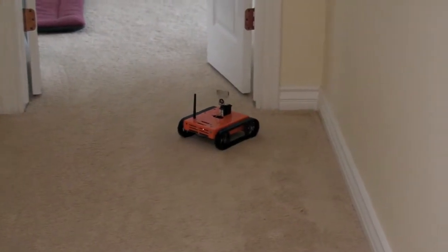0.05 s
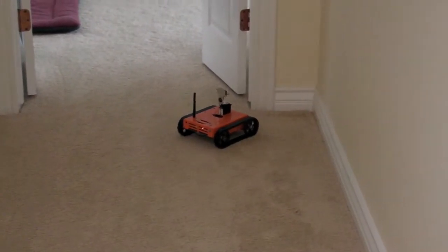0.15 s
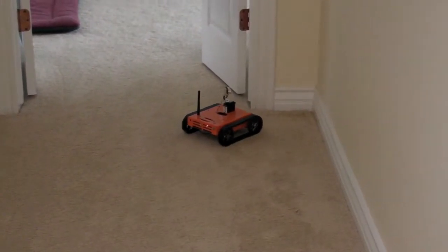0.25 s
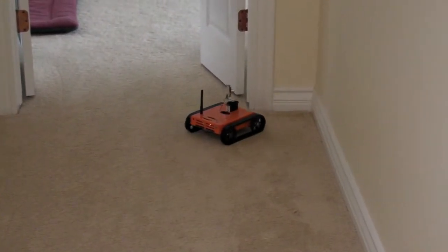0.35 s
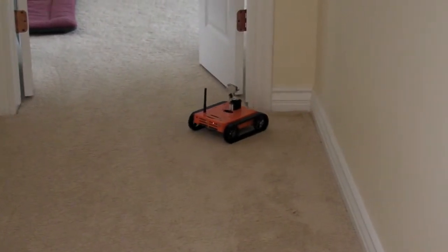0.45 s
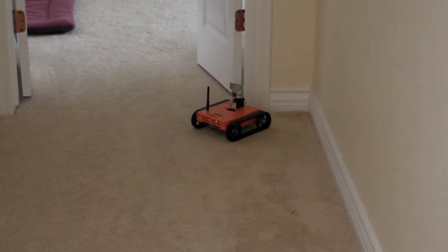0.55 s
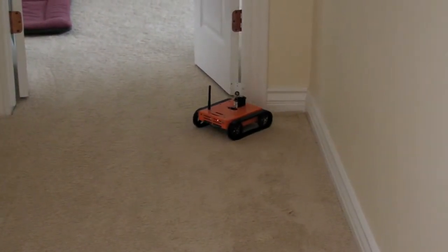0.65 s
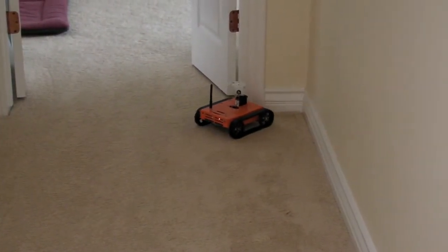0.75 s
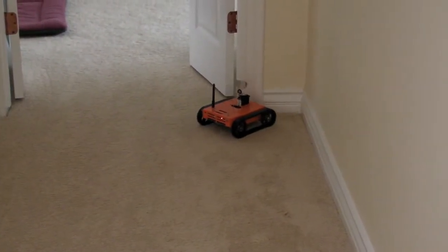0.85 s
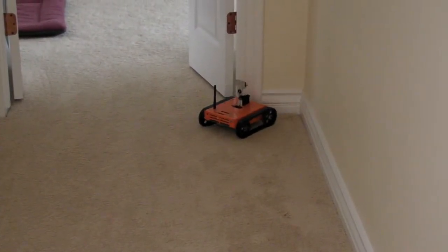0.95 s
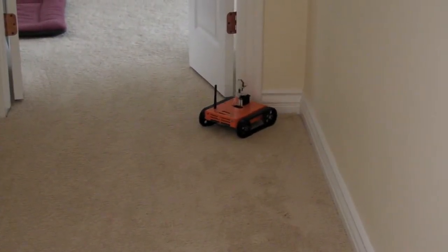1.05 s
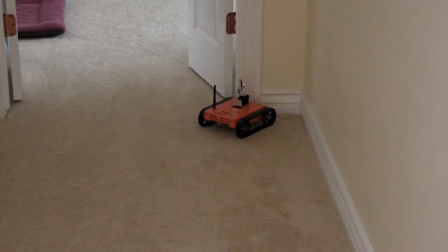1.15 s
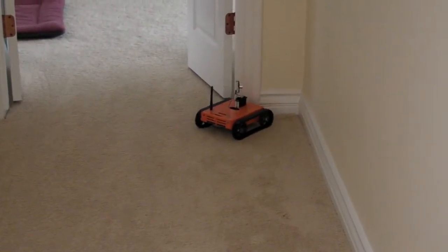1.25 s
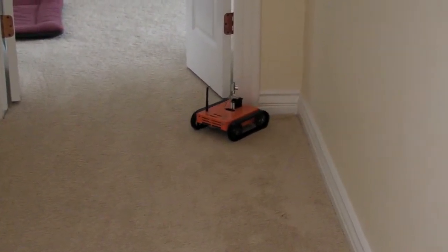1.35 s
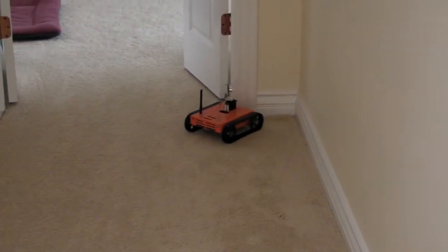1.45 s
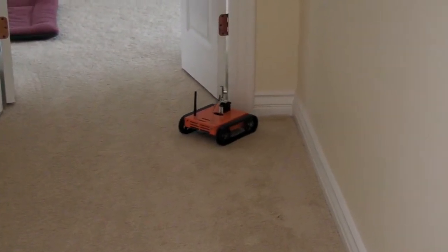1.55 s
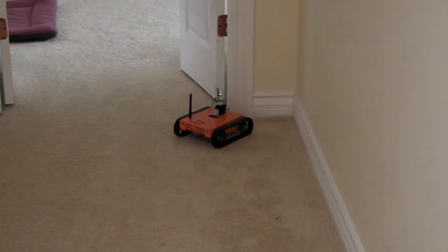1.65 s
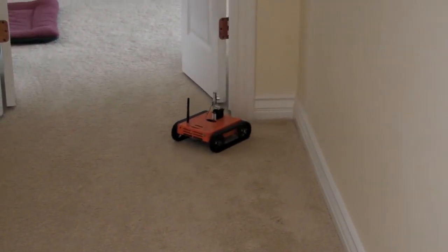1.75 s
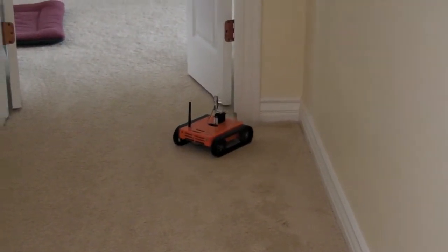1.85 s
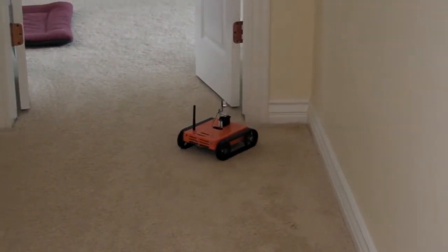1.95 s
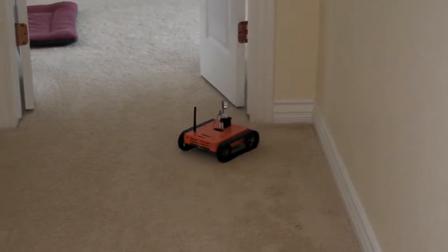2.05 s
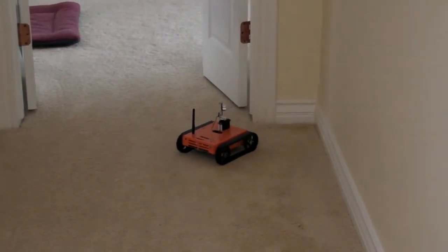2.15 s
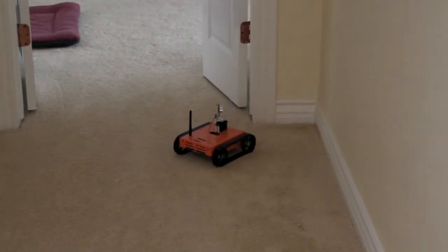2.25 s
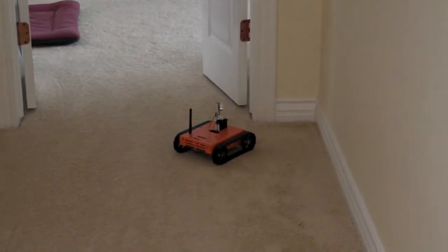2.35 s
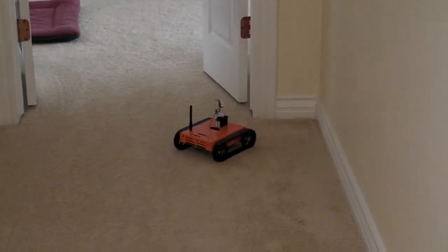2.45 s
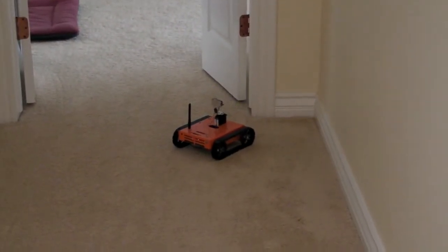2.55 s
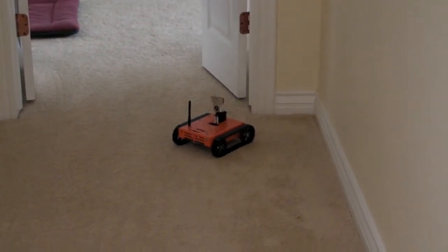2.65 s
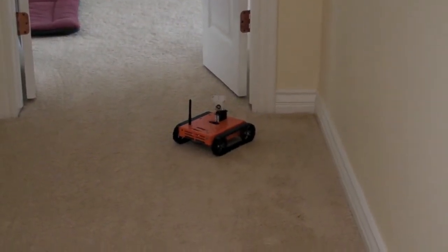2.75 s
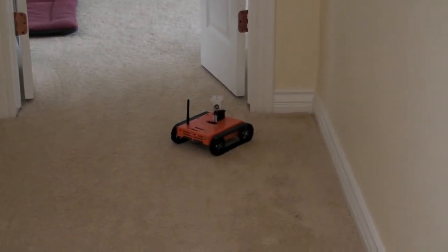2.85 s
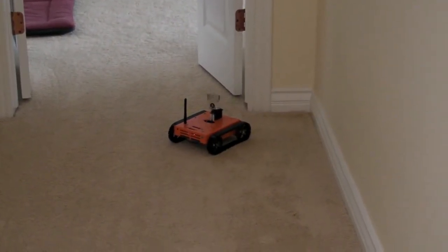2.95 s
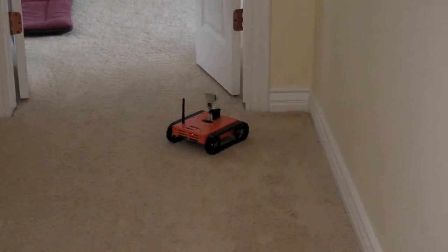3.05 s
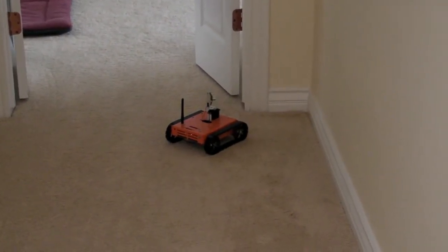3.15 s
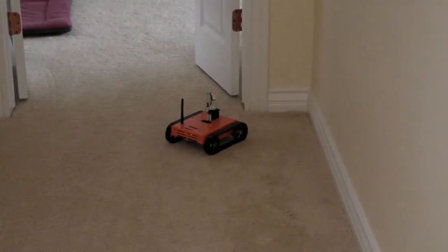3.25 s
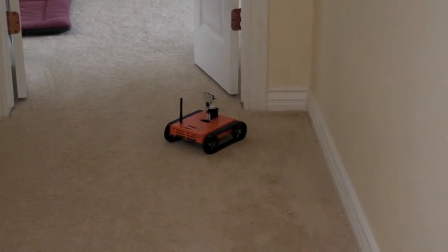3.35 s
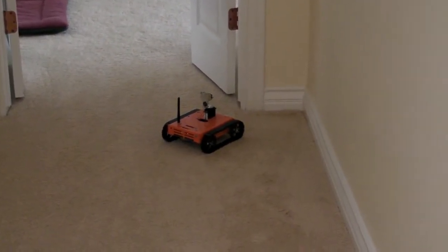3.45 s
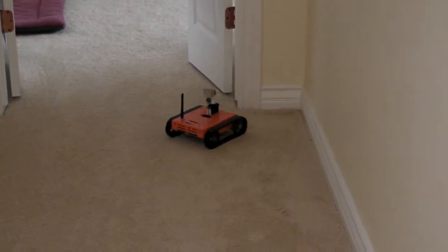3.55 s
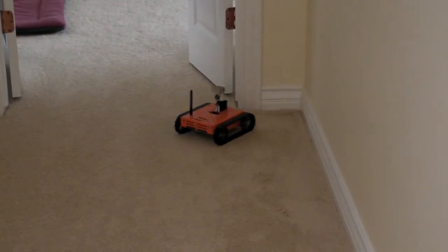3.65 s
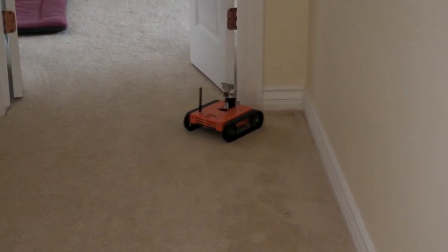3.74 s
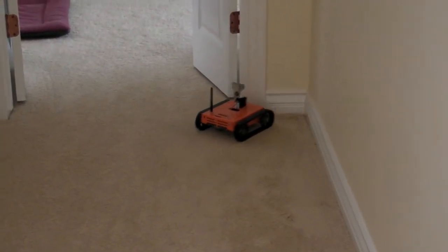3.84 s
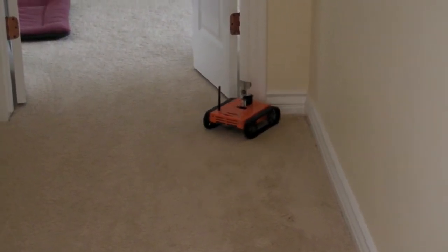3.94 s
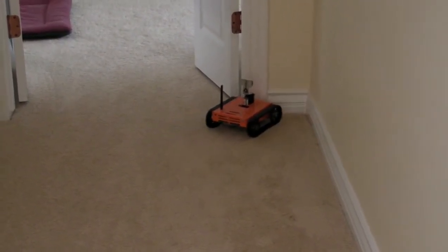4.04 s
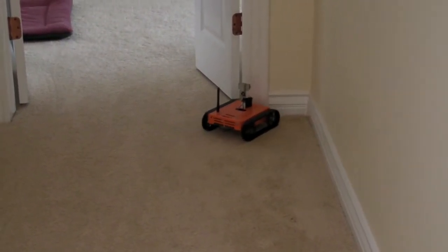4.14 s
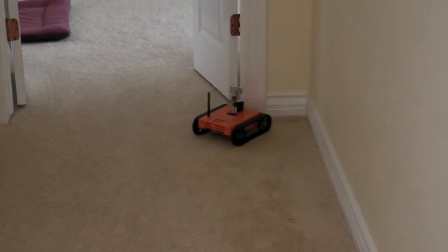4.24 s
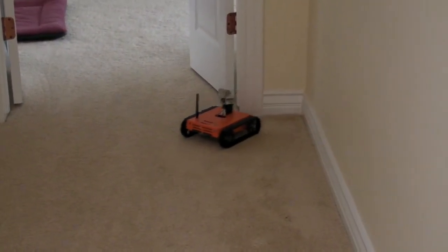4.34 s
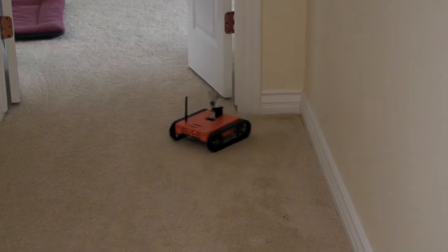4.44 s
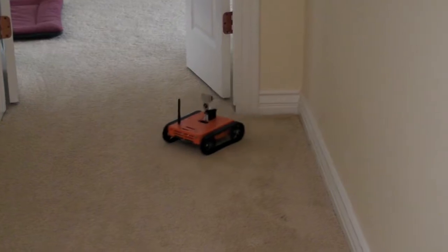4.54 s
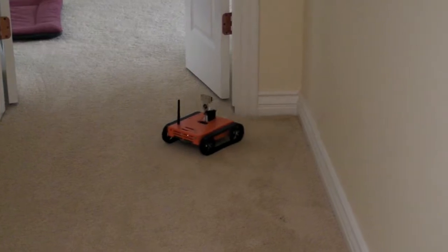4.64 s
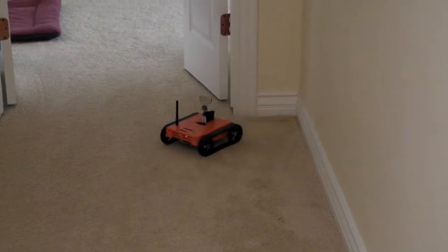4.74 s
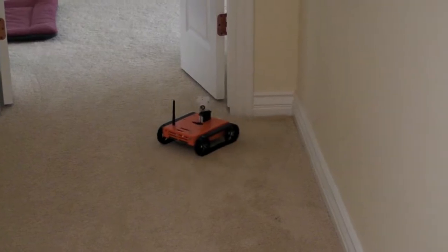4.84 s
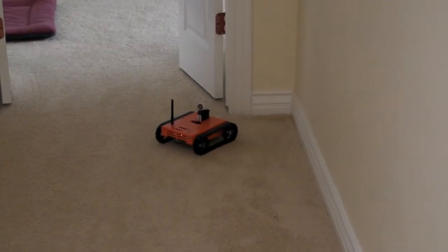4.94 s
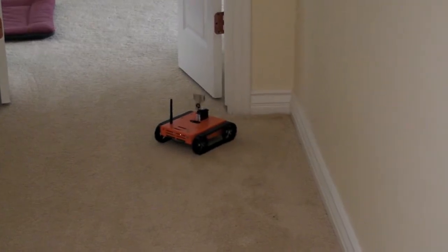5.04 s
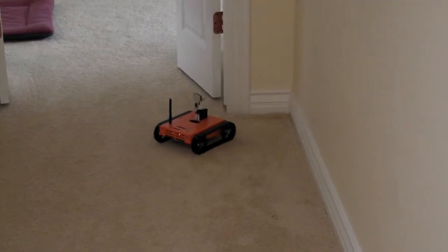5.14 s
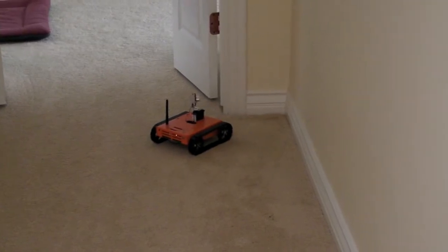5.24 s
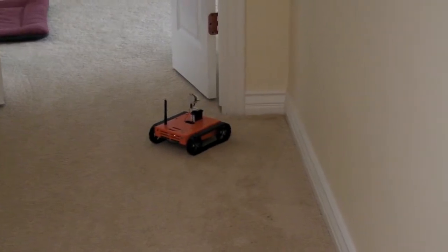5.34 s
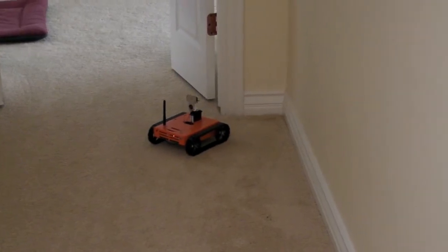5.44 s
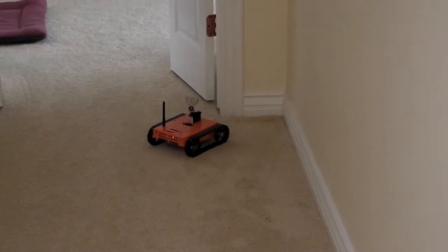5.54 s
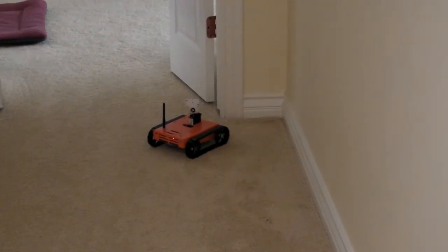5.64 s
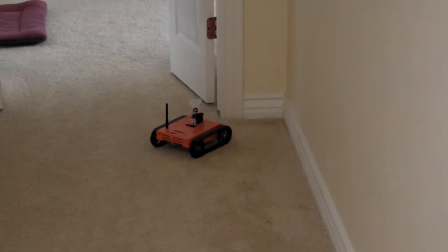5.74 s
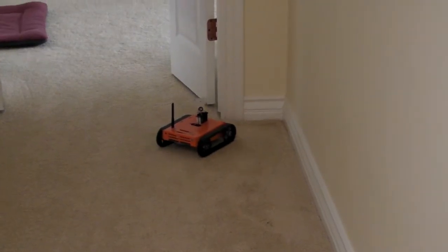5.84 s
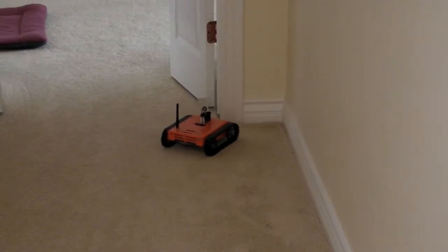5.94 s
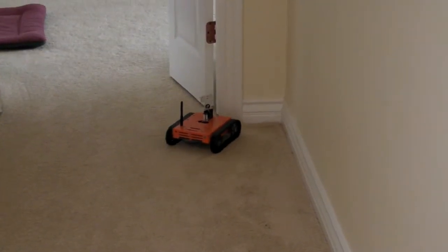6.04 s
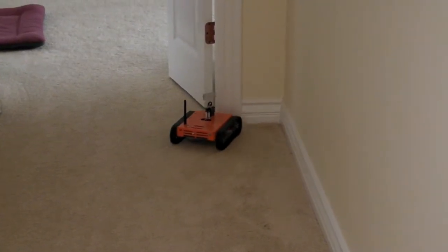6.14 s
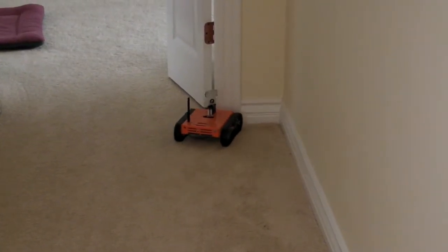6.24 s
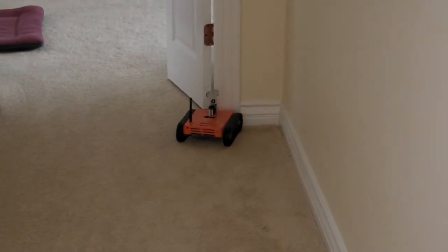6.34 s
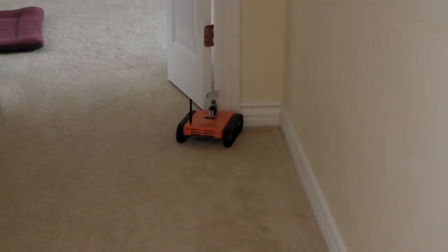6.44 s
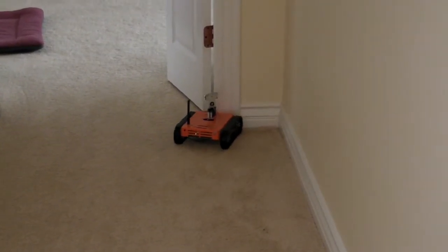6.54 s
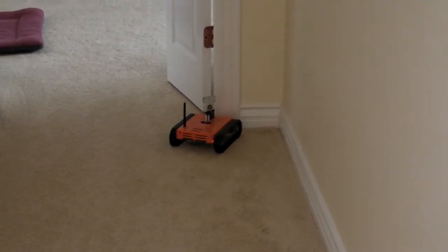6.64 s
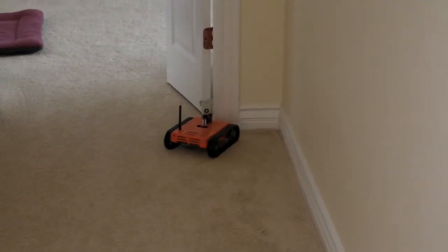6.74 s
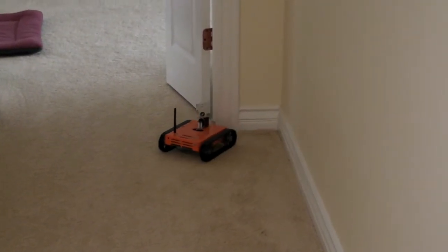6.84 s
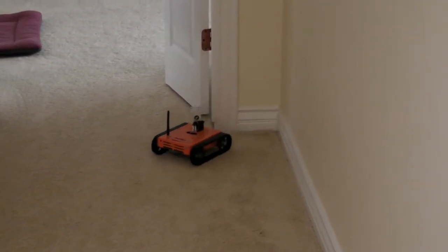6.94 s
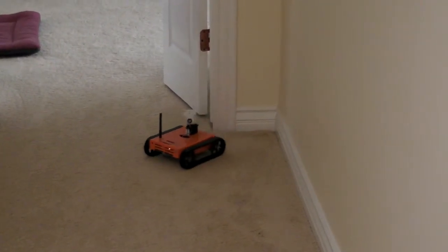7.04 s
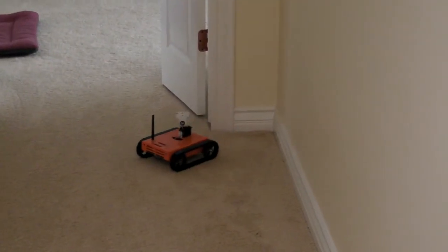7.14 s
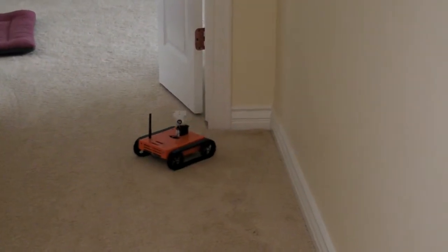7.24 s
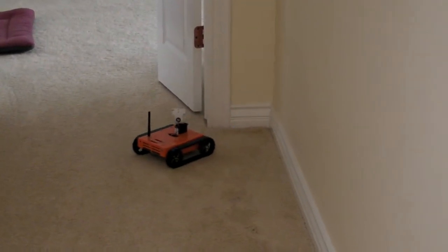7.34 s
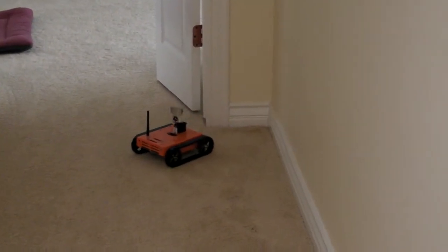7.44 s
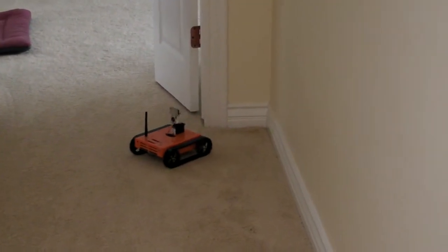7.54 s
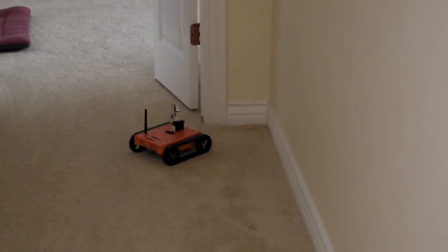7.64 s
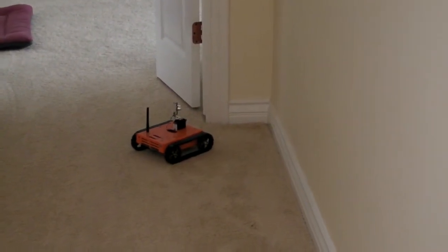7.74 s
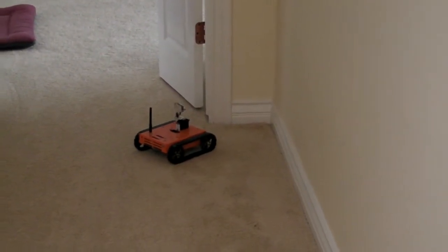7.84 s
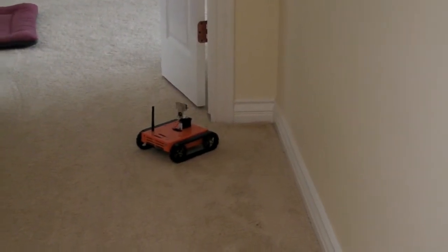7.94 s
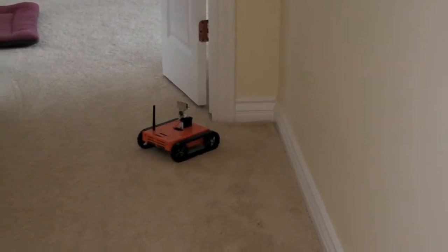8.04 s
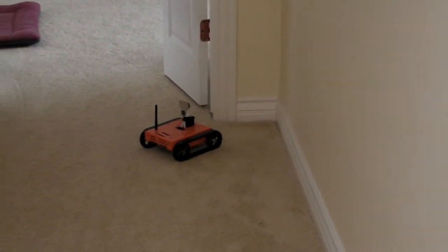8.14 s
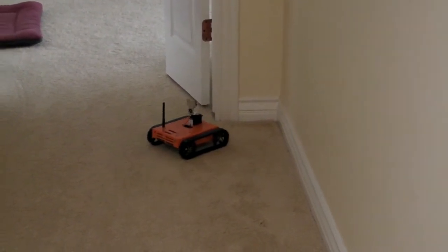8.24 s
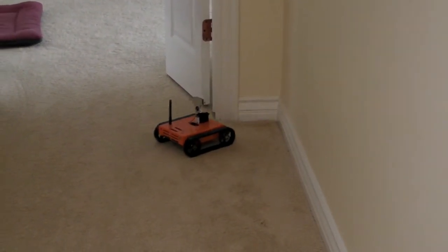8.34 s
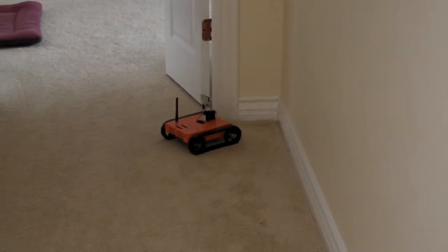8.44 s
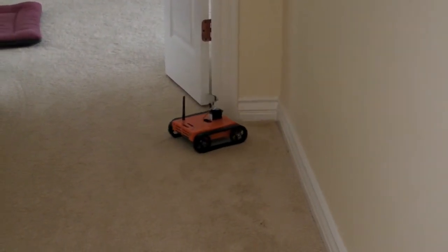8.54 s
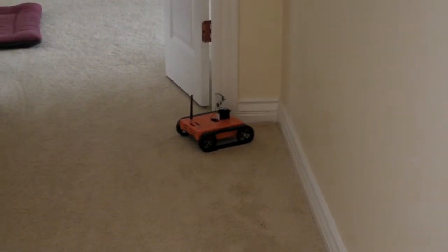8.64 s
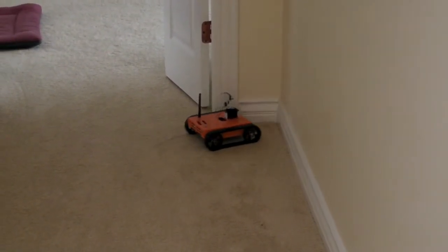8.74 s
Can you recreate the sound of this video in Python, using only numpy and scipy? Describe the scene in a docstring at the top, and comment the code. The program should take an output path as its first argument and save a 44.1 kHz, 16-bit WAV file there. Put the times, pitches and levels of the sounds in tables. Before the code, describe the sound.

In a quiet carpeted hallway, a small tracked robot already runs with a gritty gear whine, stops with a soft bump, then runs again. Tiny servo buzzes step about five a second. Two fast, higher bursts meet a hard knock between them. More servo steps, two whining turns with a thud between, three servo steps, then a quieter creep. Stereo microphone a few metres away, short room reflections.

```python
"""Short runs of grinding, whining gears shunt back and forth: a small tracked robot on hallway carpet.
Clicking, rubbing gear teeth drive a ringing hull; sines make the whines, hull rings and turning hum.
Padded noise is the treads. Three runs end with bumps, made of ringing frame modes and noise cracks.
Between runs a servo swings the sensor head in buzzing steps, about five a second.
Reflections are decaying noise; faint coloured noise is the air of the house."""
import sys
import numpy as np
from scipy import signal
from scipy.fft import rfft, irfft, next_fast_len
from scipy.io import wavfile

SR = 44100
rng = np.random.default_rng(int(sys.argv[2]) if len(sys.argv) > 2 else 0)


def to_wav(s):
    """Save 16-bit WAV."""
    ch = np.atleast_2d(s).T  # columns
    pcm = np.round(np.clip(ch, -1, 1) * 32767)  # PCM
    wavfile.write(sys.argv[1], SR, pcm.astype(np.int16))


N = 387638
T = np.arange(N) / SR   # s

# Motor runs. Each row: power on in seconds, power off in seconds, spin-up in seconds, rise of the grind
# in seconds, gait, tread rumble in dB, starting jolt in dB, gear grind (dB at mid-run before trim, swell
# in dB per second), gear hiss (the same pair), speed gained as a share per second, and the gear mesh of
# the two motors at full speed (Hz, Hz).
MOTOR_RUNS = [(-.3, 0.917, .06, 0.061, "creep", -64, 4.6, (-55, -3.1), (-50.5, 0), -0.013, (632, 640)),
              (1.099, 2.159, .052, 0.054, "creep", -65, 10, (-53, 2), (-51, 1), 0.0031, (740, 720)),
              (3.394, 3.915, .062, 0.066, "fast", -60.5, 7.5, (-46.4, 0), (-42.3, 5), 0.06, (1410, 1390)),
              (3.998, 4.416, .06, 0.043, "fast", -60.5, 2, (-45, 7), (-40, 1), 0.2, (1300, 1150)),
              (5.611, 6.316, .056, .052, "turn", -63, 7, (-50.7, -1.7), (-46, 2.2), .07, (1149, 1120)),
              (6.435, 7.061, .06, 0.06, "turn back", -63.5, 14, (-49.3, 0), (-42, 0), 0.02, (1000, 1160)),
              (8.069, 8.85, .059, 0.06, "creep", -64.5, 10.5, (-54.3, 0), (-49.3, 2.6), 0.016, (660, 626))]
# Gearbox colour for each gait. Each row: frequency in Hz, density in dB per Hz.
CREEP_COLOUR = [(470, -29), (800, -32), (873, -35), (1050, -19), (1360, -9.5), (1470, -9), (1580, -5.5),
                (1910, -0.5), (2160, -3.5), (2300, 0), (4010, 0.5), (5680, -4.5), (7460, -4), (8130, -10),
                (13000, -12), (15500, -22.5)]
FAST_COLOUR = [(470, -52), (800, -13.5), (883, -23.5), (1180, -16), (1270, -14), (1450, -11.5), (1600, -11),
               (2320, -3.5), (3130, -6.5), (3630, 0), (7460, -2), (8130, -8), (13000, -10), (14400, -12.5),
               (15500, -38)]
TURN_COLOUR = [(950, -19.5), (1300, -12), (1700, -10.5), (2300, -3.5), (2900, -6), (3450, 0), (4000, -6),
               (4500, -2), (6300, -9), (7600, -8), (8400, -16.5), (11800, -19), (13000, -13.5),
               (15000, -31)]
TURN_BACK_COLOUR = [(470, -40), (800, -9), (873, -22), (952, -25), (1380, -9), (2100, 0), (2300, -2.5),
                    (4480, -0.5), (5890, -4), (7460, -2.5), (9210, -14.5), (12900, -9), (15500, -32)]
GAIT_COLOURS = {"creep": CREEP_COLOUR, "fast": FAST_COLOUR, "turn": TURN_COLOUR, "turn back": TURN_BACK_COLOUR}
# Hull resonances stirred by the gears. Each row: frequency in Hz, width in Hz, level of the added band in dB.
HULL_MODES = [(1490, 24, 1), (2070, 30, -3), (2340, 200, -10.5), (2834, 200, -6.5), (3325, 77, -3),
              (3920, 440, -16.5), (4480, 71, -8.5)]
# Gear whines. Each row: start in seconds, stop in seconds, pitch at full speed in Hz, level in dB,
# roughness from 0 to 1.
GEAR_WHINES = [(0, .14, 2096, -63, 0.89), (0, 0.885, 1890, -65, 0.55), (0, 0.552, 2350, -60, 0.65),
               (0, 0.854, 2560, -57.5, 0.8), (0.148, 0.598, 2820, -62, .8),
               (1.277, 1.547, 1500, -60.5, 0.45), (1.299, 2.17, 3360, -58, 0.7),
               (1.67, 2.2, 2340, -56.5, 0.85), (1.9, 2.17, 2830, -58, 0.6), (3.548, 3.87, 1480, -55, 0.5),
               (3.57, 3.7, 2480, -54, .6), (3.6, 3.8, 4320, -53, 0.5), (3.648, 3.872, 2760, -55, .3),
               (4.09, 4.21, 3760, -51, .5), (4.2, 4.4, 3370, -52, .5), (4.18, 4.39, 1240, -54, 0.45),
               (4.2, 4.44, 2345, -51.5, 0.6), (5.78, 6.34, 3420, -46.5, 0.27),
               (5.73, 6.216, 2230, -51.5, .25), (5.83, 6.283, 2335, -56, 0.35),
               (5.75, 6.272, 2020, -59.5, 0.35), (5.903, 6.25, 1245, -62.5, 0.55),
               (5.8, 6.28, 1115, -65, .55), (6.49, 6.6, 3290, -52, .6), (6.53, 6.8, 2130, -56, 0.5),
               (6.55, 6.66, 4352, -50, 0.45), (6.59, 6.68, 5480, -51, 0.6), (6.6, 6.76, 3300, -50, .35),
               (6.764, 7.055, 3268, -40.3, 0.15), (6.62, 7.045, 1262, -59, .4),
               (6.53, 6.62, 1083, -62.5, .4), (6.672, 7.06, 1083, -57, .22), (8.27, 8.47, 3960, -52, .5),
               (8.25, 8.5, 2000, -57, .45), (8.52, 8.8, 1920, -61, .7), (8.299, 8.598, 773, -68, .5),
               (8.552, 8.7, 4060, -56, .6), (8.55, 8.8, 1040, -69, .6)]
# Brief rings of the hull. Each row: start in seconds, stop in seconds, pitch in Hz, level in dB.
HULL_RINGS = [(.58, .93, 3830, -57.5), (1.17, 1.37, 3880, -56), (1.28, 1.35, 2900, -57),
              (1.41, 1.55, 4490, -59), (3.43, 3.47, 2950, -54), (3.54, 3.61, 2300, -49),
              (4.055, 4.09, 3900, -49), (4.1, 4.19, 3330, -48), (5.675, 5.715, 2670, -54),
              (5.72, 5.77, 2080, -55), (5.75, 5.97, 4570, -51.5), (6.17, 6.29, 4470, -51),
              (6.455, 6.55, 4490, -48.5), (6.485, 6.52, 2600, -48), (6.51, 6.56, 2760, -50.5),
              (8.14, 8.27, 3000, -52.5), (8.28, 8.31, 2520, -56), (8.52, 8.7, 3630, -53)]
# Treads on the carpet. Each row: frequency in Hz, density in dB per Hz.
TREAD_COLOUR = [(26, -33), (45, -38), (86, -1), (118, -11.5), (200, -4.5), (253, -13.5), (388, -5),
                (425, -2.5), (551, -3.5), (619, -8.5), (761, -6.5), (890, -18), (1000, -10), (1300, -11.5),
                (2200, -120)]
# Servo steps. Each row: start in seconds, stop in seconds, level in dB, ring of the case in dB,
# centre of the sizzle in Hz.
SERVO_STEPS = [(0.912, 1.053, -59, 8, 9500), (2.388, 2.552, -58.5, -36, 9400), (2.595, 2.772, -55, 2, 9450),
               (2.798, 2.954, -57.5, 1, 9400), (2.983, 3.152, -59.5, -7, 9500),
               (3.192, 3.358, -59, -2, 9450), (4.642, 4.82, -56, 7, 9350), (4.85, 4.998, -57, 8, 8850),
               (5.035, 5.205, -59.5, 4, 8950), (5.242, 5.408, -59.5, 3, 9450), (5.45, 5.62, -55.5, 7, 9400),
               (7.294, 7.45, -55.5, 13, 8950), (7.495, 7.65, -59.5, 7, 9000),
               (7.705, 7.916, -58.5, 4, 9150)]
# Servo gears. Each row: frequency in Hz, density in dB per Hz.
SERVO_COLOUR = [(880, -65), (1500, -14), (2310, -5.5), (2860, -8.5), (3120, -10), (3400, -4.5), (3950, -1),
                (4300, -7.5), (5140, -1.5), (5610, -5.5), (6000, -2), (7450, 1.5), (8130, -5), (9230, -5.5),
                (10700, -5), (11800, -12.5), (13600, -3.5), (15500, -15)]
# The chassis hits the door frame or lurches. Each row: time in seconds, thud in dB before trim,
# centre of the contact force in Hz, its breadth as a frequency ratio, crack in dB.
CONTACTS = [(0.848, -36.5, 660, 1.15, -71), (0.849, -42, 1250, 1.4, -75), (0.851, -36, 280, 1.3, -80),
            (0.867, -35.5, 135, 1.6, -80), (0.895, -45, 330, 1.5, -80), (0.92, -45, 440, 1.15, -85),
            (3.906, -21.3, 760, 1.45, -27), (3.915, -31, 1100, 1.4, -44), (3.922, -33, 125, 1.4, -60),
            (3.93, -25, 430, 1.7, -44), (3.977, -37.5, 580, 1.3, -60), (6.301, -26, 780, 1.12, -48),
            (6.304, -24, 370, 1.25, -55), (6.329, -30, 390, 1.3, -55), (6.34, -38, 170, 1.6, -60),
            (6.345, -44, 1100, 1.3, -60), (6.38, -42, 400, 1.3, -75), (8.086, -51.5, 140, 1.6, -86)]
# Modes of frame and chassis. Each row: frequency in Hz, level in dB, 60 dB decay time in seconds.
FRAME_MODES = [(85, -9, 0.28), (131, -11.5, 0.22), (180, -10, 0.071), (216, -10, 0.07), (311, -5, 0.067),
               (391, -8, 0.097), (433, -6.5, 0.1), (476, -8.5, 0.093), (562, 1, 0.023), (670, -0.5, 0.052),
               (733, 1, 0.038), (890, 3, 0.013), (1130, 4.5, 0.01), (1490, -5, 0.044)]
# Crack of the plastic shell. Each row: frequency in Hz, density in dB per Hz.
CRACK_COLOUR = [(900, 4), (2000, -4), (5000, 0), (8000, 2), (10000, -4.5), (15000, -10)]
# Air of the quiet house. Each row: frequency in Hz, density in dB per Hz.
AIR_COLOUR = [(25, -10.5), (60, -12), (130, -3), (250, -7.5), (430, 2), (600, -5.5), (900, -8), (2000, -11),
              (4000, -14), (8000, -23.5), (15000, -37)]
# Spread of diffuse sound between the ears. Each row: frequency in Hz, side over mid in dB.
STEREO_WIDTH = [(30, -28), (100, -7.5), (500, -6), (1000, -4.5), (2200, -3.5), (4000, -2), (8000, 4.5),
                (14000, 2)]

AIR_DB = -68.5
HALL_T60_S, HALL_DB = 0.29, 0   # decay time, reflected over direct sound
CUTOFF_HZ = 15200


def gearboxes(coast_s=0.051, flutter_db=0.9, split_hz=3400, grind_db=1.4, hiss_db=0.06, jolt_s=0.013,
              shudder=.002, sag_s=1.3, standstill=0.14, grind_power=0.97, hiss_power=1.28):
    """Two gear trains at unlike speeds; their grind and the hiss above it grow with effort and load."""
    out = np.zeros((2, N))
    for on, off, spin_s, rise_s, gait, _, jolt_db, grind_load, hiss_load, creep, motors in MOTOR_RUNS:
        t = on + T[:2 * SR]
        speed = motor_speed(t, on, off, spin_s, creep)
        # the tooth rate stays in a safe range and holds its last value after power off
        held = np.clip(np.interp(np.minimum(t, off), t, speed), .4, 2)

        sound = 0
        for mesh_hz in motors:
            teeth = gear_teeth(mesh_hz * held * (1 + shudder * drift(70, len(t))))
            boxed = colour(resonate(teeth, HULL_MODES), GAIT_COLOURS[gait])
            sound = sound + passing_walls(boxed)
        grind = cut(sound, split_hz, "low", order=5)
        hiss = cut(sound, split_hz, "high", order=5)

        effort = standstill + (1 - standstill) * gate(t, on, off, rise_s, sag_s)
        grind_level = from_db(grind_db) * gear_level(t, on, off, *grind_load) * effort ** grind_power
        hiss_level = from_db(hiss_db) * gear_level(t, on, off, *hiss_load) * effort ** hiss_power
        gears = grind_level * grind / grind.mean(0).std() + hiss_level * hiss / hiss.mean(0).std()

        jolt = jolt_db * np.exp((on - t) / jolt_s)   # the teeth take up their slack
        flutter = flutter_db * drift(49.25, len(t))
        add(out, gears * from_db(jolt + flutter) * gate(t, on, off, 0.00054, coast_s), on)
    return out


def motor_speed(t, on, off, spin_s, creep, coast_s=1.3, wander=.0015):
    """Share of full speed: a quick spin-up, a slow further change, a sag when the power is cut."""
    return gate(t, on, off, spin_s, coast_s) * (1 + creep * (t - on)) * (1 + wander * drift(14, len(t)))


def gear_teeth(mesh_hz, uneven=0.17, chance=0.39, rub=1.0, throb=0.2, count=10):
    """Each tooth clicks with a strength partly its own, partly chance; clicks and rub swell once a turn."""
    teeth = np.cumsum(mesh_hz) / SR
    tooth = teeth.astype(int)
    own = uneven * rms_one(rng.standard_normal(count))[tooth % count]
    strength = 0.27 + own + chance * rng.standard_normal(len(teeth))
    clicks = rms_one(np.diff(tooth, prepend=0) * strength)
    rubbing = rub * rng.standard_normal(len(teeth))
    return (clicks + rubbing) * (1 + throb * np.sin(2 * np.pi * teeth / count))


def gear_level(t, on, off, db, swell_db_per_s):
    """The load shifts steadily from the start of a run to its end."""
    return from_db(db + swell_db_per_s * (np.minimum(t, off) - (on + off) / 2))


def passing_walls(x, change_per_s=1.827):
    """Two patterns of reflections trade places again and again as the robot rolls along."""
    here = hallway(x, HALL_DB, HALL_T60_S)
    there = hallway(x, HALL_DB, HALL_T60_S)
    turn = 2 * np.pi * (change_per_s * T[:len(x)] + rng.random())
    return (here + there) / 2 + (here - there) / np.sqrt(2) * np.cos(turn)


def whines(whine_db=0, rise_s=0.0083, fall_s=0.016, rattle_per_s=75, spread=0.24, wide_hz=3500):
    """As the load shifts, gears bite and sing at pitches tied to motor speed; loose teeth roughen them."""
    out = np.zeros((2, N))
    for start, stop, full_hz, db, rough in GEAR_WHINES:
        # the latest run to have started drives this gear
        on, off, spin_s, *_, creep, _ = [run for run in MOTOR_RUNS if run[0] < start][-1]
        t = start + T[T < stop - start + .15]
        pitch_hz = full_hz * motor_speed(t, on, off, spin_s, creep)
        tone = rough_tone(pitch_hz, rough, rattle_per_s, spread * min(full_hz / wide_hz, 1))
        add(out, from_db(whine_db + db) * gate(t, start, stop, rise_s, fall_s) * tone, start)
    return out


def hull_rings(ring_db=0, rise_s=.012, fall_s=.025, rough=.75, rattle_per_s=90, spread=.25):
    """A gear passing through a hull resonance makes it sing briefly, roughly, around one fixed pitch."""
    out, t = np.zeros((2, N)), T[:SR * 3 // 4]
    for start, stop, hz, db in HULL_RINGS:
        tone = rough_tone(np.full(len(t), hz), rough, rattle_per_s, spread)
        add(out, from_db(ring_db + db) * gate(t, 0, stop - start, rise_s, fall_s) * tone, start)
    return out


def rough_tone(hz, rough, rattle_per_s, spread):
    """A stereo sine, partly blurred by rattle, wandering a little between the ears."""
    size, rough = len(hz), np.clip(rough, 0, 1)
    tone = np.exp(2j * np.pi * np.cumsum(hz) / SR)
    rattle = drift(rattle_per_s, size) + 1j * drift(rattle_per_s, size)
    tone = tone * (np.sqrt(1 - rough ** 2) + rough * rattle)
    side = spread * (drift(14.3, size) + 1j * drift(13.5, size))
    return np.real(tone * (1 + side * [[1], [-1]]))


def treads(lumpy_db=-0.5, rise_s=0.028, fall_s=0.1):
    """Rubber cleats pad unevenly over the carpet: low noise with a lumpy level."""
    level = sum(from_db(db) * gate(T, on, off, rise_s, fall_s) for on, off, _, _, _, db, *_ in MOTOR_RUNS)
    padding = rms_one(cut(colour(diffuse(N), TREAD_COLOUR), 1500, "low", order=4))
    return level * from_db(lumpy_db * drift(40, N)) * padding


def turning_hum(hum_hz=436, hum_db=-65.5, rise_s=0.26, fall_s=0.05, blur=0.0063, waver=0.32):
    """The chassis hums while the treads scrub sideways in a turn."""
    turns = [run for run in MOTOR_RUNS if run[4].startswith("turn")]
    level = sum(gate(T, on, off, rise_s, fall_s) for on, off, *_ in turns)
    phase = 2 * np.pi * np.cumsum(hum_hz * (1 + blur * drift(30, N))) / SR
    return np.sqrt(2) * from_db(hum_db) * level * np.sin(phase) * (1 + waver * drift(40, N))


def servo(mesh_hz=1700, rise_s=0.006, fall_s=0.022, flutter_db=1.8, wet_db=-2.5, t60=0.25,
          ring_hz=3350, ring_width_hz=100, buzz_hz=7600, buzz_width_hz=160, buzz_db=2,
          sizzle_width_hz=260, sizzle_db=1):
    """Tiny fast gears buzz in a plastic case, which rings a little differently for each step of the head."""
    out, t = np.zeros(N), T[:SR // 2]
    for start, stop, db, ring_db, sizzle_hz in SERVO_STEPS:
        rate_hz = mesh_hz * (1 + .04 * drift(30, len(t)))
        teeth = colour(gear_teeth(rate_hz, chance=1.0, rub=0.96, throb=0.06), SERVO_COLOUR)
        case = [(ring_hz, ring_width_hz, ring_db),
                (buzz_hz, buzz_width_hz, buzz_db),
                (sizzle_hz, sizzle_width_hz, sizzle_db)]
        level = from_db(db + flutter_db * drift(62.6, len(t))) * gate(t, 0, stop - start, rise_s, fall_s)
        add(out, level * rms_one(resonate(teeth, case)), start)
    return hallway(out, wet_db, t60)


def bumps(crack_s=0.011, thud_db=-2.0, wet_db=-0.5, t60=0.38, upper_t60=0.29, boom_hz=750, spread=0.24):
    """Each contact rings the frame through its own band of force, and cracks the shell at its own level."""
    knocks, cracks = np.zeros(N), np.zeros(N)
    t = T[:SR // 10]
    for s, db, hz, breadth, crack_db in CONTACTS:
        click = 1.0 * (t == 0)
        add(knocks, from_db(db) * cut(click, [hz / breadth, hz * breadth], "band", order=1), s)
        crack = rms_one(colour(rng.standard_normal(len(t)), CRACK_COLOUR)) * np.exp(-t / crack_s)
        add(cracks, from_db(crack_db) * crack, s)

    thud = 0
    for k, (hz, db, decay_s) in enumerate(FRAME_MODES):
        thud = thud + (-1) ** k * from_db(db) * ring(knocks, hz, decay_s)   # neighbours alternate in sign
    thud = from_db(thud_db) * thud
    boom = cut(thud, boom_hz, "low", order=1)   # reflections of the low part linger longer
    thud = hallway(boom, wet_db, t60) + hallway(thud - boom, wet_db, upper_t60)
    # the thud runs straight down the hall to both ears
    thud = spread * thud + (1 - spread) * thud.mean(0)
    return thud + hallway(cracks, wet_db=-5.5, t60=0.055)


def house_air():
    """The quiet house: steady, faint noise, wide in the treble."""
    return from_db(AIR_DB) * rms_one(colour(diffuse(N), AIR_COLOUR))


def hallway(x, wet_db, t60):
    """Direct sound plus dense, dying reflections from the close walls."""
    t = T[:SR // 2]
    tail = diffuse(len(t)) * from_db(-60 * t / t60) * (t > .002)
    response = from_db(wet_db) * tail / np.sqrt(np.sum(tail.mean(0) ** 2))
    response[:, 0] += 1   # direct sound
    heard = signal.fftconvolve(x[None], response, axes=1)[:, :len(x)]
    return heard / np.sqrt(1 + from_db(2 * wet_db))


def diffuse(size):
    """Stereo noise, nearly alike in the bass and widest in the treble."""
    mid, side = rng.standard_normal((2, size))
    return mid + colour(side, STEREO_WIDTH) * [[1], [-1]]


def resonate(x, modes):
    """A plastic case stresses narrow bands, given as (Hz, width Hz, dB)."""
    return x + sum(from_db(db) * signal.lfilter(*signal.iirpeak(hz, hz / width, SR), x)
                   for hz, width, db in modes)


def ring(clicks, hz, t60):
    """A unit click sets a decaying sine of starting height 1 ringing."""
    r = from_db(-60 / (t60 * SR))
    w = 2 * np.pi * hz / SR
    return signal.lfilter([0, np.sin(w)], [1, -2 * r * np.cos(w), r * r], clicks + 1e-18)


def colour(x, spectrum):
    """Shapes a sound by (Hz, dB) points, with a roll-off below the first."""
    size = next_fast_len(x.shape[-1], True)
    hz, db = np.transpose(spectrum)
    bins = np.maximum(np.arange(size // 2 + 1) * SR / size, 1)
    gain = from_db(np.interp(np.log(bins), np.log(hz), db)) * np.minimum(bins / hz[0], 1) ** 2
    return irfft(rfft(x, size) * gain, size)[..., :x.shape[-1]]


def cut(x, hz, kind, order=2):
    """Keeps the low, high or middle band with a Butterworth filter."""
    return signal.sosfilt(signal.butter(order, hz, kind, fs=SR, output="sos"), x)


def drift(rate, size):
    """Slow chance: straight lines between random knots of spread 1, rate knots a second."""
    knots = rng.standard_normal(2048)
    return np.interp(np.arange(size) / SR * rate, np.arange(len(knots)), knots)


def gate(t, start, stop, rise, fall):
    """Swells from the start, dies away after the stop."""
    swell = 1 - np.exp(-np.maximum(t - start, 0) / rise)
    return swell * np.exp(-np.maximum(t - stop, 0) / fall)


def from_db(db):
    """Decibels to an amplitude factor."""
    return 10 ** (np.asarray(db) / 20)


def rms_one(x):
    """Scales a sound to an RMS of 1."""
    return x / np.sqrt(np.mean(x ** 2) + 1e-20)


def add(out, sound, start):
    """Mixes a sound in from the given time on, trimmed to the length of the scene."""
    at = round(start * SR)
    part = sound[..., max(-at, 0):N - at]
    out[..., max(at, 0):max(at, 0) + part.shape[-1]] += part


def scene():
    """Drive, head servo and bumps over the faint air of the house."""
    drive = gearboxes() + whines() + hull_rings() + treads() + turning_hum()
    return drive + servo() + bumps() + house_air()


def record(dry):
    """The recorder has a narrow notch in the treble and cuts the top."""
    notched = cut(dry, [7780, 8040], "bandstop")
    return signal.sosfilt(signal.ellip(10, .1, 80, CUTOFF_HZ, fs=SR, output="sos"), notched)


dry = scene()
out = record(dry)
to_wav(out)
```